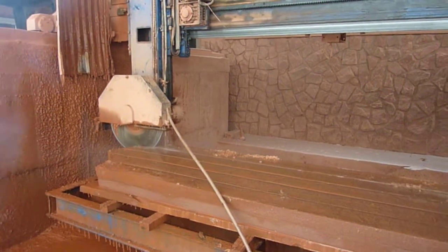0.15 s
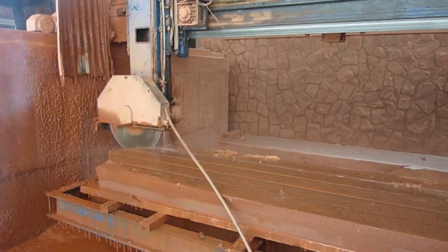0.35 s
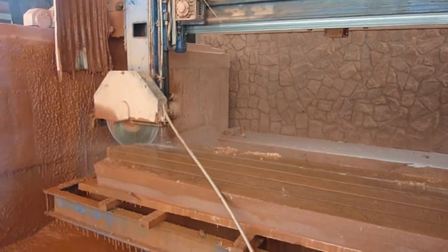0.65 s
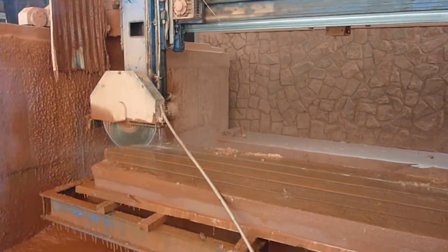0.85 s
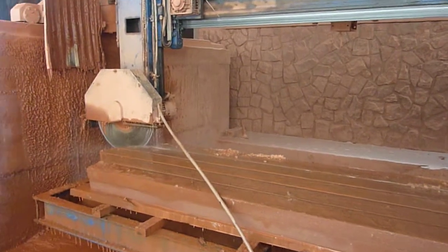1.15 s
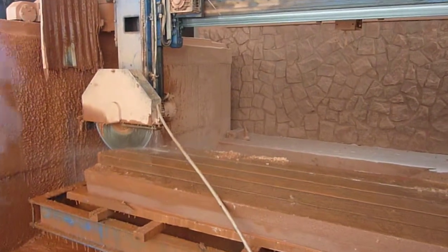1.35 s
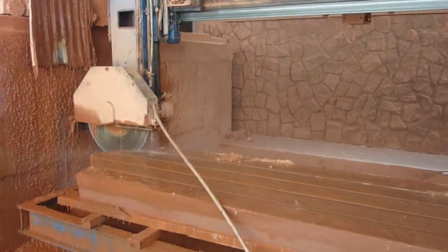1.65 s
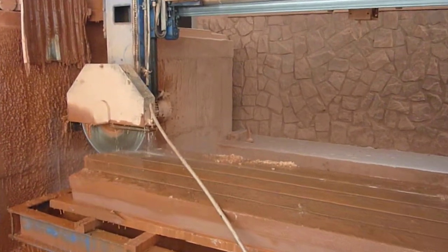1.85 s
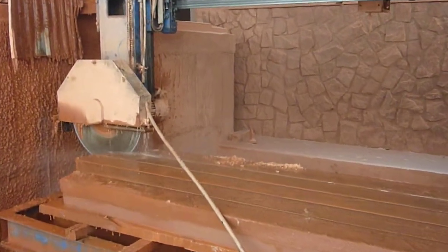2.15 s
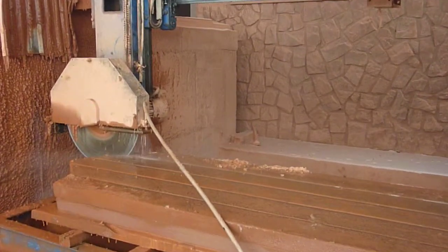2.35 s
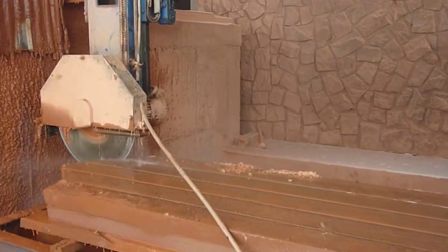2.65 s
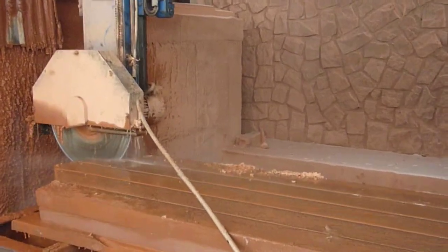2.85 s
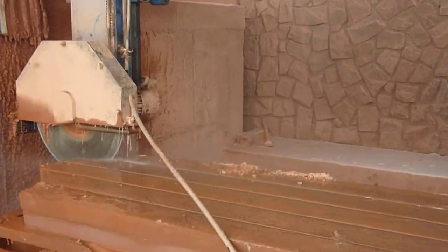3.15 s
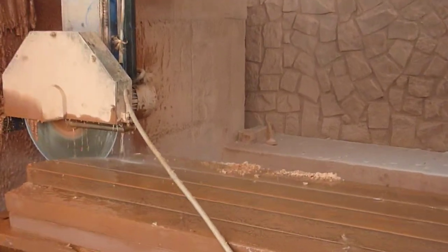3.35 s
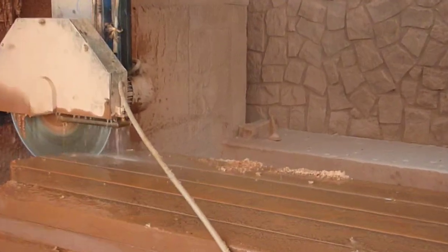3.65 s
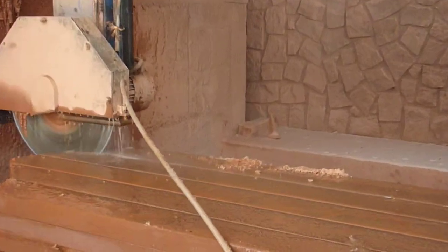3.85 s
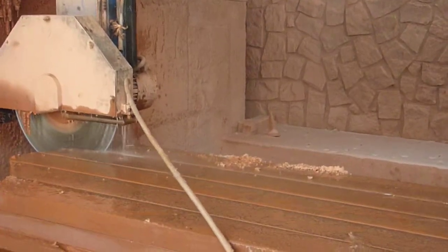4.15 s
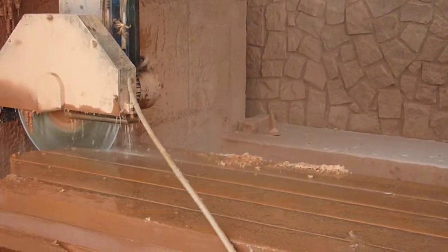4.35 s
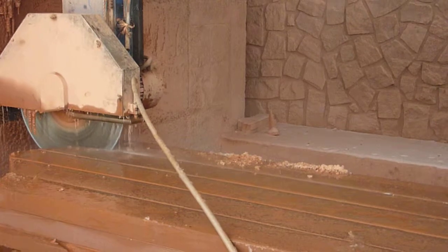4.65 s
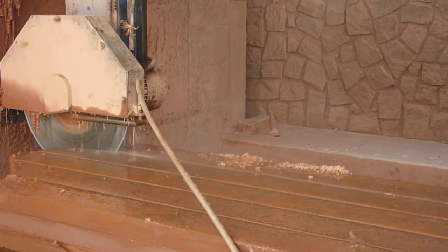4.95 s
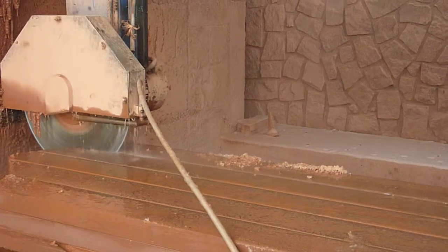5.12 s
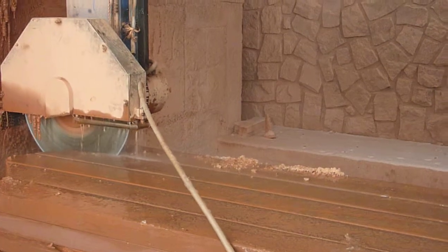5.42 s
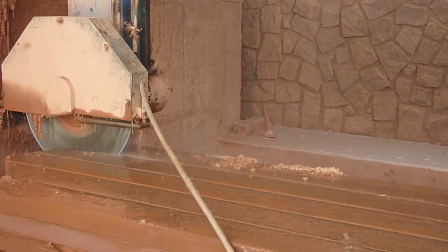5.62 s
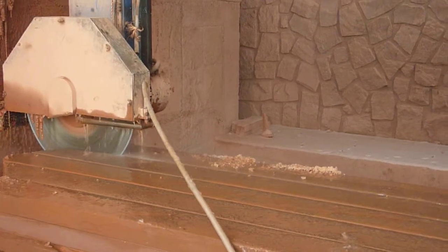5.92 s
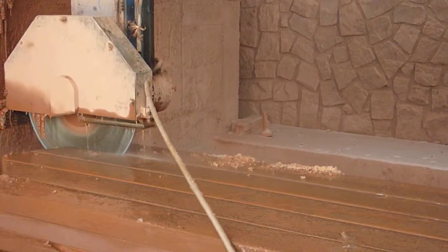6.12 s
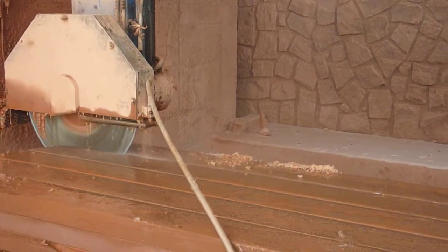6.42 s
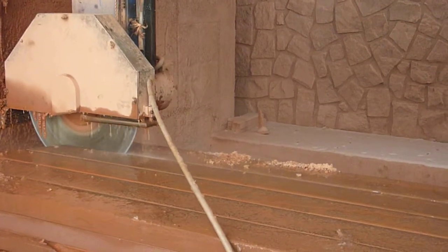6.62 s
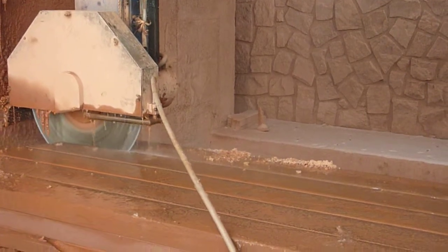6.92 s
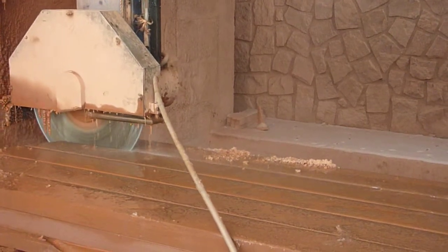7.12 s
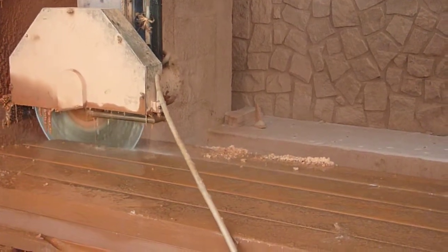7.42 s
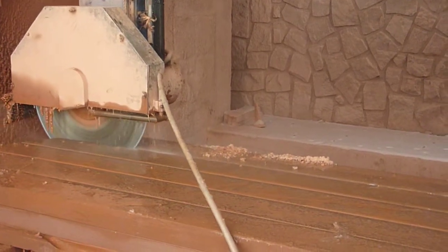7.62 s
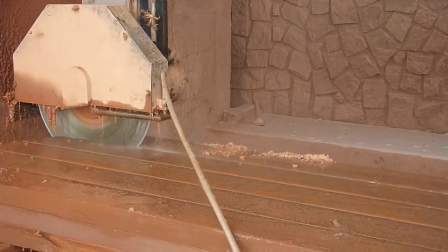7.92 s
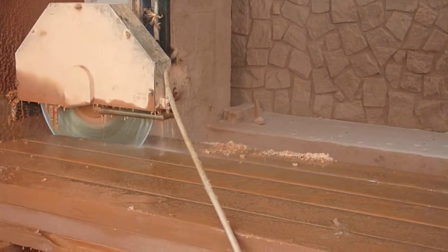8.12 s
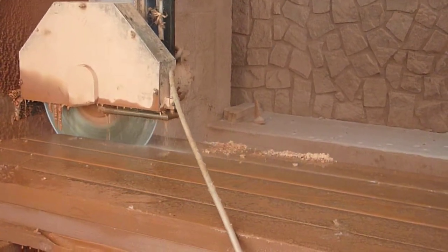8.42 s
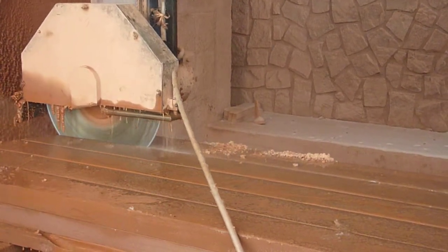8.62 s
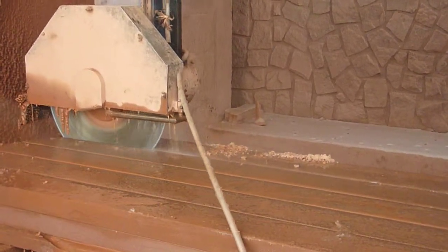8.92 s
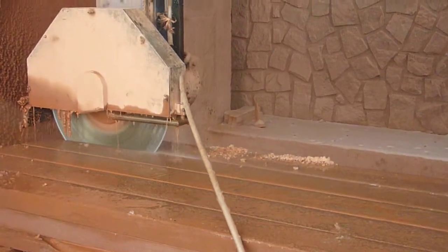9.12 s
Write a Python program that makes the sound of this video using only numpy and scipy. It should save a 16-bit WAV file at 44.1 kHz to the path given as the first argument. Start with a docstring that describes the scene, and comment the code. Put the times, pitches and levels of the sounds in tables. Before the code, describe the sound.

A water-cooled stone saw drones and whines through a deep cut, then eases into a lighter, hissing, rasping pass with faint hums.

```python
"""Bridge saw in stone

A water-cooled bridge saw grinds through a slab in a workshop: a deep, droning cut for three seconds,
then a lighter pass. Each turn repeats a pattern of segment blows; the depth of the bite sets chatter
and drone, and the steel disc whines and squeals on multiples of the turning rate. Coloured noise makes
the rasp of grit, the rush of slurry and the hiss of cooling water, heard by a small stereo recorder."""
import sys
import numpy as np
from scipy import signal
from scipy.fft import rfft, irfft, next_fast_len
from scipy.io import wavfile
from scipy.ndimage import uniform_filter1d

SR = 44100
rng = np.random.default_rng(int(sys.argv[2]) if len(sys.argv) > 2 else 0)


def wav_record(signal):
    """Record a signal, one row per channel, as 16-bit PCM in the file named by sys.argv[1]."""
    frames = np.transpose(np.atleast_2d(signal))
    bounded = np.clip(frames, -1, 1)
    # unit amplitude maps onto the largest positive 16-bit level
    quanta = np.round(bounded * 32767).astype(np.int16)
    wavfile.write(sys.argv[1], SR, quanta)


N = 408807

# Blade speed. Each row: time in seconds, turns per second.
BLADE_SPEED = [(0.0, 24.98), (0.35, 24.93), (0.61, 24.97), (1.1, 24.875), (3.24, 24.895), (4.1, 24.96),
               (4.5, 24.88), (5.56, 24.72), (6.23, 24.7), (9.27, 24.72)]
# How deep the blade bites. Each row: time in seconds, depth from 0 to 1.
BITE_DEPTH = [(0, 0.78), (.48, 0.7), (.55, 0.68), (.68, 0.67), (.88, 0.82), (2.0, 0.89), (2.6, 0.98),
              (3.1, 0.97), (3.33, 0.44), (4.1, 0.3), (4.9, 0.16), (6.4, 0.12), (9.27, 0.01)]

# Colour of the slurry and churned air. Each row: frequency in Hz, relative level in dB per Hz.
SLURRY_COLOUR = [(25, -31), (60, -21.5), (120, -11.5), (250, -4.5), (500, -1), (750, -2), (1100, -2.5),
                 (1700, -4), (2100, -19.5), (3000, -33)]
# Rasp of grit in the kerf, before surge and flicker. Each row: time in seconds, level in dB.
GRIT_LEVEL = [(0, -28.5), (.45, -31), (.56, -34), (1.6, -36), (2.8, -31), (3.15, -32.5), (3.35, -31.5),
              (3.7, -30.5), (4.2, -28), (4.6, -32.5), (5.3, -31.5), (5.8, -34.5), (6.4, -33), (7.3, -33.5),
              (7.65, -31), (7.95, -35), (9.27, -32.5)]
# Colour of the grit. Each row: frequency in Hz, relative level in dB per Hz.
GRIT_COLOUR = [(1000, -32), (1700, -5), (2200, -3.5), (3000, -1), (4200, 1.5), (5200, -1), (6200, -8.5),
               (8000, -40.5)]
# Hiss of water thrown off the rim, before a fixed lift. Each row: time in seconds, level in dB.
SPRAY_LEVEL = [(0, -32.5), (.6, -31), (1.2, -36), (2.1, -35), (3.1, -32), (3.28, -26), (3.72, -25.5),
               (5.1, -26.5), (6.4, -26), (7.04, -26), (7.12, -23.5), (7.24, -27), (7.5, -27.5), (7.76, -25),
               (8.1, -27.5), (8.6, -25.5), (9.27, -27)]
# Colour of the spray. Each row: frequency in Hz, relative level in dB per Hz.
SPRAY_COLOUR = [(3500, -38.5), (5100, -16), (5700, -4.5), (6300, -1.5), (6950, 0), (7550, -3), (8000, -9),
                (8350, -13), (8800, -31)]

# Hums of guard, frame and slab. Each row: multiple of the turning rate, level in dB in the lightest cut,
# level in dB in the deepest.
FRAME_TONES = [(4, -69.5, -46), (5, -58.5, -53.5), (6, -59.5, -71.5), (7, -56, -60.5), (8, -54.5, -64),
               (9, -57, -48.5), (10, -57, -54), (11, -54, -37.5), (12, -60, -31.5), (13, -58, -43),
               (14, -54.5, -37.5), (19, -60.5, -39.5), (24, -62.5, -33), (26, -57.5, -57), (28, -50, -49.5),
               (30, -54, -52)]
# Hums swelling and fading as the head travels along the bridge. Each row: start in seconds,
# length in seconds, multiple of the turning rate, level in dB at the crest.
HUM_SWELLS = [(-.3, 0.81, 14, -33.5), (-.2, 0.74, 11, -41), (.7, 0.39, 11, -40), (2.1, 1.43, 5, -45.5),
              (2.3, 1.22, 11, -33.5), (2.096, 1.32, 12, -39), (2.7, 0.97, 14, -37.5), (2.4, 0.76, 24, -42),
              (2.95, 0.48, 24, -36.5), (3.1, 0.94, 12, -41), (4.35, 0.19, 28, -42.5), (4.4, 5.3, 6, -54.5),
              (4.6, 2, 8, -52.5), (4.6, 1.8, 11, -46.5), (4.696, 3, 12, -40), (4.9, 3.4, 13, -47.5),
              (5.0, 1.9, 14, -42.5), (5.547, 0.75, 30, -45.5), (5.4, 3.8, 10, -47), (7.0, 0.99, 5, -49),
              (6.8, 1.3, 8, -46.5), (7.602, 1.46, 11, -44), (7.803, 1.7, 12, -45), (8.1, 0.96, 5, -53.5),
              (7.9, 1.5, 7, -50.5), (8.09, 1.8, 9, -45.5), (8.7, 1.5, 26, -44)]
# Hums sagging as the disc rubs and then comes free. Each row: start in seconds, length in seconds,
# multiple of the turning rate, change in dB at the lowest point.
HUM_DIPS = [(-.7, 1.5, 12, -2.5), (.35, 0.37, 11, -10), (.45, .3, 14, -3), (0.35, 0.63, 24, -4.5),
            (0.5, 0.37, 4, -6)]

# Hoarse screeches of grit scraping a disc resonance without locking it. Each row: start in seconds,
# length in seconds, first frequency in Hz, last frequency in Hz, level in dB at the crest.
SCREECHES = [(-.15, 0.32, 4230, 4240, -33), (3.33, 0.43, 1450, 1420, -36), (3.704, .32, 1460, 1450, -38),
             (3.75, 0.27, 3510, 3530, -39), (3.9, 2.3, 3030, 3070, -41), (4.45, 0.31, 2850, 2850, -37),
             (4.3, 0.7, 2350, 2300, -42), (5.05, 0.7, 2350, 2260, -40), (5.1, 0.28, 2650, 2680, -43),
             (5.15, 0.23, 3540, 3500, -41), (5.5, 0.35, 2370, 2370, -40), (5.55, .7, 3100, 3080, -41),
             (7.45, 0.45, 3580, 3600, -40.5), (7.8, 1.6, 4280, 4270, -46)]

# Tones of the steel disc. Each row: multiple of the turning rate, level in dB in the lightest cut,
# level in dB in the deepest, level in dB that the rub builds towards.
DISC_TONES = [(36, -50.5, -33, -29), (57, -57.5, -42.5, -38), (60, -64, -39, -27.5), (72, -52, -43, -56),
              (84, -60, -45, -46), (96.3, -50.5, -48, -33), (108, -58, -48.5, -37),
              (133, -58.5, -51.5, -34), (144, -48, -44, -35), (180, -53.5, -47.5, -28.5),
              (252, -53.5, -50, -37), (288, -51, -45, -35)]
# Squeals, where one tone of the disc catches. Each row: start in seconds, length in seconds,
# multiple of the turning rate, level in dB.
SQUEALS = [(-.1, 0.71, 252, -30), (-.1, .3, 288, -34), (-.1, .65, 144, -38), (-.1, 0.5, 180, -38),
           (-.05, 0.46, 60, -37), (.2, 0.36, 288, -37), (.48, .3, 36, -35.5), (.63, 0.49, 60, -32.5),
           (.72, .55, 288, -34), (.75, 0.36, 252, -34.5), (0.747, 2.64, 36, -31), (0.753, 2.1, 72, -42.5),
           (.88, 0.26, 144, -34.5), (.85, 0.87, 96, -41), (0.943, 0.41, 180, -37.5),
           (1.048, 1.55, 252, -31.5), (1.1, 1, 36, -30), (1.206, 2.26, 60, -35), (1.202, 1.9, 180, -39.5),
           (1.2, 1.1, 288, -43), (1.6, .85, 180, -37), (1.72, 0.35, 144, -38.5), (1.703, 1.65, 72, -49),
           (1.997, 1.9, 36, -42.5), (2.2, 0.76, 60, -36), (2.3, 1, 108, -44.5), (2.403, 1.1, 72, -39.5),
           (2.747, .6, 144, -43), (3.4, 0.9, 36, -41.5), (3.5, 0.13, 252, -26), (4, 0.32, 72, -31.5),
           (3.997, 0.48, 108, -36.5), (4.003, 0.51, 144, -38.5), (3.75, .25, 60, -38), (4.05, .4, 60, -43),
           (4.1, 0.27, 180, -41), (4.17, .27, 144, -36), (4.362, 0.33, 72, -35), (4.4, 0.72, 72, -37),
           (4.3, 0.89, 108, -43.5), (4.4, .3, 36, -44), (4.5, 0.45, 144, -43), (4.5, .27, 96, -42),
           (4.53, 0.23, 60, -44), (4.9, 0.75, 72, -44), (5.08, 0.31, 96, -38.5), (5.3, 0.43, 36, -44.5),
           (5.5, 1.2, 72, -46), (5.802, 1, 36, -45), (6.2, .3, 144, -41), (6.25, .45, 72, -41),
           (6.68, 0.36, 36, -43), (6.7, .4, 72, -45.5), (7.148, 1.04, 72, -44), (7.35, .92, 36, -45),
           (8.87, 0.28, 36, -45)]
# How deeply the wobble of the disc throbs its tones. Each row: multiple of the turning rate,
# share from 0 to 1.
WOBBLE_THROB = [(36, 0.18), (60, 0.23), (180, .2), (252, .12), (288, 0)]

# Chatter colour in the deep cut. Each row: frequency in Hz, relative level in dB per line.
DEEP_COLOUR = [(50, -70.5), (100, -56.5), (170, -62), (450, -55.5), (700, -40), (1100, -52), (1450, -42.5),
               (1950, -53.5), (2200, -47), (3000, -54), (4500, -52.5), (5400, -50.5), (6200, -44.5),
               (7300, -49.5), (8500, -81.5)]
# Chatter colour in the light cut. Each row: frequency in Hz, relative level in dB per line.
LIGHT_COLOUR = [(50, -81.5), (100, -68), (170, -66.5), (260, -61), (420, -53.5), (700, -56.5), (1100, -59),
                (1400, -58.5), (2000, -60.5), (3000, -59.5), (4500, -55), (6500, -52), (8500, -70)]
# Strong lines of the deep chatter. Each entry: multiple of the turning rate, relative level in dB.
DEEP_LINES = {32: -38.5, 33: -36.5, 34: -43, 35: -44, 37: -38.5, 40: -46, 48: -39.5, 56: -46.5, 58: -48.5,
              61: -43.5, 64: -44.5, 70: -45.5, 73: -46.5, 85: -45.5, 87: -45.5, 89: -44, 120: -42.5, 251:
              -40.5}

# Standing waves that lift or hollow a band as the head moves. Each row: start in seconds,
# length in seconds, first frequency in Hz, last frequency in Hz, width in Hz, change in dB at the crest.
STANDING_WAVES = [(.42, 0.49, 1850, 1850, 350, -3), (2.85, .55, 880, 880, 160, -2),
                  (2.85, 1.04, 3700, 3870, 600, 2.5), (3.15, 0.62, 1850, 2020, 604, -2),
                  (3.15, 0.6, 2700, 2930, 900, -2), (3.2, 1.4, 190, 195, 46, -7.5),
                  (3.9, 0.6, 560, 560, 200, -5), (4.1, 1.5, 520, 570, 46, 5), (5.3, 1.5, 514, 520, 46, -18),
                  (5.4, 1.7, 600, 640, 46, 7.5), (5.1, 0.99, 740, 745, 46, 3.5),
                  (6.4, 2.2, 660, 665, 46, 3), (6.603, 1.3, 530, 523, 46, 5.5),
                  (6.9, 0.67, 440, 440, 46, 3), (7.6, 1.4, 720, 720, 46, 2.5), (7.7, 1.9, 368, 368, 46, -7)]
# Reflected sound on the side signal. Each row: frequency in Hz, gain in dB.
REFLECTION_COLOUR = [(60, -30), (300, -30), (600, -21), (1100, -16), (2200, -9.5), (4400, -4.3),
                     (7000, -4.5), (8500, -4.5)]
# Lean of the hiss to the left as the spray swings about. Each row: time in seconds,
# side signal as a share of the mid before the colour below.
HISS_LEAN = [(0, .17), (2.8, .13), (3.25, .3), (3.8, .22), (4.15, .35), (4.45, .27), (5.3, .37), (6.2, .41),
             (6.8, .28), (7.2, .37), (7.45, .23), (7.9, .5), (8.3, .26), (9.27, .31)]
# Colour of that lean, weak at 2 to 3 kHz and strongest from about 4 to 7 kHz.
# Each row: frequency in Hz, gain in dB.
HISS_LEAN_COLOUR = [(500, -6), (2000, -13), (3000, -12), (3700, -3), (4300, 1.5), (6000, 1), (7000, -1.5),
                    (8500, -4)]
# Standing-wave path of the disc tones to the microphones. Each row: frequency in Hz,
# lean to the left as a share, lead of the left as a share.
WHINE_SIDE = [(900, .105, .17), (1800, .11, .22), (2700, -.04, .6), (3600, -.06, .72), (4480, 0, .6),
              (6270, .25, .55), (7170, .45, .85)]
# Narrow notches of the recorder's filters. Each row: frequency in Hz, width in Hz.
NOTCHES = [(5430, 260), (7905, 240), (8100, 240)]

# Levels in dB: (lightest cut, deepest cut)
CHATTER_DB, SLURRY_DB = (-32.5, -25.5), (-42.5, -32.5)
# The contact surges at an even pace: one crest and the period in seconds
SURGE_AT_S, SURGE_PERIOD_S = 4.53, 0.76
CHATTER_SURGE_DB, GRIT_SURGE_DB = 2.0, -0.5  # at zero depth; the grit sinks as the chatter swells
# Disc rubbing in the kerf, all its tones ringing at once: (start, length) in seconds
RUB = (-0.015, 0.543)
RUB_GROW_DB_PER_S, RUB_EDGE_S = 18, 0.053  # builds until the disc comes free; attack and release
SQUEAL_ATTACK_S, SQUEAL_RELEASE_SHARE = 0.091, 0.39  # release as a share of the squeal's length
# The blade finds a new seat in the kerf and the hums slip in phase: (start, length) in seconds
RESEAT = (0.55, 0.34)
GROUPS = 12  # groups of segments around the rim
DEEP_GROUP_DB, LIGHT_GROUP_DB = 4, 5.5  # lift on multiples of the groups' passing rate
LOOSE_DEPTH, HELD_DEPTH = 0.19, 0.92  # chatter shifts freely below the first, holds one pattern above
SCREECH_WIDTH_HZ = 62
MACHINE_LEAN = 0.115  # lean to the left: side signal as a share of the mid
TOP_HZ = 8850


def undb(db):
    """Decibels to gain."""
    return 10 ** (np.asarray(db) / 20)


def unit(x):
    """Scale to rms 1."""
    return x / np.sqrt(np.mean(x ** 2))


def seconds():
    """Time of every sample."""
    return np.arange(N) / SR


def curve(rows):
    """Join (seconds, value) rows by straight lines."""
    return np.interp(seconds(), *np.transpose(rows))


def colour(hz, points):
    """Gain of a (Hz, dB) spectrum at the given frequencies."""
    point_hz, db = np.transpose(points)
    return undb(np.interp(np.log(hz + 1), np.log(point_hz), db))


def shape(x, response):
    """Filter by a function of frequency."""
    size = next_fast_len(N + 4096)
    spectrum = rfft(x, size) * response(np.fft.rfftfreq(size, 1 / SR))
    return irfft(spectrum, size)[:N]


def noise(points):
    """Noise of a given colour, rms 1."""
    return unit(shape(rng.standard_normal(N), lambda hz: colour(hz, points)))


def walk(rate):
    """Wandering control signal, rms 1: random levels, `rate` per second, smoothed twice."""
    hold = int(SR / rate)
    steps = np.repeat(rng.standard_normal(N // hold + 1), hold)
    return unit(uniform_filter1d(uniform_filter1d(steps, hold), hold)[:N])


def around(table, turns):
    """Read a table laid once around the blade."""
    return np.interp(turns % 1 * len(table), np.arange(len(table) + 1), np.append(table, table[0]))


def line(multiple, turns, drift=0):
    """One multiple of the turning rate, rms 1, from a random phase; drift is in radians."""
    return np.sqrt(2) * np.cos(2 * np.pi * (multiple * turns + rng.random()) + drift)


def by_depth(depth, light_db, deep_db):
    """Gain that moves evenly in dB from the lightest cut to the deepest."""
    return undb(light_db + (deep_db - light_db) * depth)


def catch(start, length, attack_s, release_s):
    """Envelope of a ringing: attack, hold, release."""
    t = seconds() - start
    return np.clip(np.minimum(t / attack_s, (length - t) / release_s), 0, 1)


def swell(start, length):
    """Envelope of a passing resonance: one smooth arch."""
    return np.sin(np.pi * np.clip((seconds() - start) / length, 0, 1))


def surge(depth):
    """Slow, even rise and fall of the contact; a deep kerf holds the blade steady."""
    return (1 - depth) * np.cos(2 * np.pi * (seconds() - SURGE_AT_S) / SURGE_PERIOD_S)


def resonance(x, start, length, first_hz, last_hz, width_hz):
    """Band-pass whose centre glides between two frequencies: shift to 0 Hz, low-pass, shift back."""
    centre_hz = curve([(start, first_hz), (start + length, last_hz)])
    carrier = np.exp(2j * np.pi * np.cumsum(centre_hz) / SR)
    pole = np.exp(-np.pi * width_hz / SR)
    return 2 * np.real(carrier * signal.lfilter([1 - pole], [1, -pole], x * carrier.conj()))


def rim(uneven_db, floor, size=4096):
    """Contact force over one turn: the groups of segments each stand a little higher or lower."""
    angle = np.arange(size) / size * GROUPS
    height = undb(uneven_db * rng.standard_normal(GROUPS))[angle.astype(int)]
    return unit(floor + height * np.sin(np.pi * angle) ** 4)


def slurry_gain(depth):
    """Slurry and churned air rush louder as the blade bites deeper."""
    return by_depth(depth, *SLURRY_DB)


def grit_gain(depth):
    """Grit rasps unevenly in the kerf and gives way slightly at each surge of the contact."""
    return undb(curve(GRIT_LEVEL) + GRIT_SURGE_DB * surge(depth) + walk(45))


def spray_gain():
    """Water leaves the rim in uneven splashes: the hiss flickers slowly, quickly and very quickly."""
    flicker_db = 0.7 * walk(10) + 0.5 * walk(70) + 0.54 * walk(500)
    return undb(curve(SPRAY_LEVEL) + 1.0 + flicker_db)


def wash(turns, force, depth):
    """Slurry, grit and spray pulse with the segments: the direct sound and an unrelated reflected twin."""
    pulse = np.clip(0.076 + (0.21 - 0.076) * depth, 0, 1)
    wobble = 0.083 * np.cos(2 * np.pi * turns)
    gate = 1 - pulse + pulse * around(force, turns) + wobble
    # Even out the average over several turns, then flutter
    gate = gate / np.sqrt(uniform_filter1d(gate ** 2, size=7100)) * undb(0.06 * walk(35))
    layers = [(SLURRY_COLOUR, slurry_gain(depth)),
              (GRIT_COLOUR, grit_gain(depth)),
              (SPRAY_COLOUR, spray_gain())]
    direct = gate * sum(noise(points) * gain for points, gain in layers)
    reflected = gate * sum(noise(points) * gain for points, gain in layers)
    return direct, reflected


def drone(turns, depth):
    """Hums of guard, frame and slab beat together, follow the depth and wander more in a light cut."""
    hums = 0
    reseated = curve([(RESEAT[0], 0), (sum(RESEAT), 1)])
    for multiple, light_db, deep_db in FRAME_TONES:
        passing = sum(undb(db) * swell(start, length)
                      for start, length, tone, db in HUM_SWELLS if round(tone) == round(multiple))
        dip_db = sum(db * swell(start, length)
                     for start, length, tone, db in HUM_DIPS if round(tone) == round(multiple))
        slip = rng.uniform(-2.5, 2.5) * reseated
        drift = (0.75 - 0.45 * depth) * walk(2.5) + 0.15 * walk(20) + slip
        gain = np.hypot(by_depth(depth, light_db, deep_db), passing)
        hums = hums + line(round(multiple), turns, drift) * gain * undb(dip_db + walk(9))
    return hums * undb(0.62 * walk(25))


def screeches():
    """Scraping grit rings one resonance of the disc for a moment: narrow noise, hoarse and gliding."""
    scrapes = 0
    for start, length, first_hz, last_hz, db in SCREECHES:
        scrape = resonance(rng.standard_normal(N), start, length, first_hz, last_hz, SCREECH_WIDTH_HZ)
        scrapes = scrapes + unit(scrape) * undb(db) * swell(start, length)
    return scrapes


def whines(turns, depth):
    """The disc sings on multiples of its speed as it bites, rubs or catches; wobble throbs all but the top."""
    disc = 0
    rub_growth_db = RUB_GROW_DB_PER_S * np.minimum(seconds() - sum(RUB), 0)
    rub = catch(*RUB, RUB_EDGE_S, RUB_EDGE_S) * undb(rub_growth_db)
    for multiple, light_db, deep_db, rub_db in DISC_TONES:
        squeal_power = 0
        for start, length, tone, db in SQUEALS:
            if round(tone) == round(multiple):
                squeal = undb(db) * catch(start, length, SQUEAL_ATTACK_S, SQUEAL_RELEASE_SHARE * length)
                squeal_power = squeal_power + squeal ** 2
        gain = np.sqrt(by_depth(depth, light_db, deep_db) ** 2 + (undb(rub_db) * rub) ** 2 + squeal_power)
        throb_depth = np.interp(multiple, *np.transpose(WOBBLE_THROB))
        throb = 1 + throb_depth * np.cos(2 * np.pi * (turns + rng.random()))
        # A loose contact roughens the tone
        judder = 0.035 * np.sqrt(multiple) * (1 - 0.85 * depth) * walk(130)
        tone = line(multiple, turns, 0.02 * np.sqrt(multiple) * walk(11) + judder)
        flicker_db = 0.9 * walk(19) + (0.5 - depth) * walk(3.7)
        disc = disc + tone * throb * gain * undb(flicker_db)
    return disc


def turn_pattern(force, points, lines, group_db, scatter_db, count=350):
    """One turn of chatter: the blows set the timing of the lines, disc and slab set their strength."""
    blows = rfft(force * rng.standard_normal(len(force)))[:count]
    scatter = undb(scatter_db * (rng.standard_normal(count).clip(-2, 2) - 1.0))
    gain = colour(np.arange(count) * BLADE_SPEED[0][1], points) * scatter
    gain[::GROUPS] *= undb(group_db)
    gain[list(lines)] = undb(list(lines.values()))
    # Disc and frame multiples sound on their own
    gain[[0, *(round(row[0]) for row in DISC_TONES + FRAME_TONES)]] = 0
    return unit(irfft(gain * blows / np.abs(blows), 2 * len(force)))


def chatter(turns, force, depth):
    """Segments knock on stone: a deep cut holds one pattern, a light one drifts among four and surges."""
    deep = around(turn_pattern(force, DEEP_COLOUR, DEEP_LINES, DEEP_GROUP_DB, scatter_db=4.0), turns)
    patterns = [around(turn_pattern(force, LIGHT_COLOUR, {}, LIGHT_GROUP_DB, scatter_db=4.5), turns)
                for _ in range(4)]
    contact = undb(np.array([8 * walk(2) for _ in patterns]))
    light = np.sum(contact * patterns, axis=0) / np.linalg.norm(contact, axis=0)
    held = np.sqrt(np.clip((depth - LOOSE_DEPTH) / (HELD_DEPTH - LOOSE_DEPTH), 0, 1))
    blend = held * deep + np.sqrt(1 - held ** 2) * light  # equal-power crossfade
    waver_db = CHATTER_SURGE_DB * surge(depth) + 1.05 * walk(9)
    return blend * by_depth(depth, *CHATTER_DB) * undb(waver_db)


def microphones(machine, whine, hiss, reflected):
    """The saw is louder and earlier on the left; reflections widen the treble and scatter the whines."""
    direct = machine + hiss
    # An imaginary gain turns the phase, so the left channel leads
    lead = shape(direct, lambda hz: 1j * np.interp(hz, [0, 1600], [0, 0.3]))
    hiss_side = curve(HISS_LEAN) * shape(hiss, lambda hz: colour(hz, HISS_LEAN_COLOUR))
    lean = MACHINE_LEAN * machine + hiss_side
    tone_hz, tone_lean, tone_lead = np.transpose(WHINE_SIDE)
    scatter = shape(whine, lambda hz: np.interp(hz, tone_hz, tone_lean + 1j * tone_lead))
    side = lean + lead + scatter + shape(reflected, lambda hz: colour(hz, REFLECTION_COLOUR))
    mid = direct + whine
    return np.array([mid + side, mid - side])


def travel(x):
    """Standing waves of the workshop lift and hollow drifting bands as the head moves."""
    changes = 0
    for start, length, first_hz, last_hz, width_hz, db in STANDING_WAVES:
        band = resonance(x, start, length, first_hz, last_hz, width_hz)
        changes = changes + (undb(db * swell(start, length)) - 1) * band
    return x + changes


def scene():
    """One turning blade drives the layers, and the workshop carries them to the microphones."""
    turns = np.cumsum(curve(BLADE_SPEED)) / SR
    depth = np.clip(curve(BITE_DEPTH), 0, 1)
    force = rim(uneven_db=4.0, floor=0.38)
    hiss, reflected_hiss = wash(turns, force, depth)
    machine = drone(turns, depth) + screeches() + chatter(turns, force, depth)
    # A second, unrelated chatter stands for its reflections
    reflected = reflected_hiss + undb(0.5) * chatter(turns, force, depth)
    return travel(microphones(machine, whines(turns, depth), hiss, reflected))


def record(dry):
    """The recorder notches the treble and cuts the top steeply."""
    for hz, width_hz in NOTCHES:
        dry = signal.lfilter(*signal.iirnotch(hz, hz / width_hz, fs=SR), dry)
    low_pass = signal.ellip(10, 0.2, 80, TOP_HZ, fs=SR, output="sos")  # ripple and stop-band in dB
    return signal.sosfilt(low_pass, dry)


dry = scene()
out = record(dry)
wav_record(out)
```